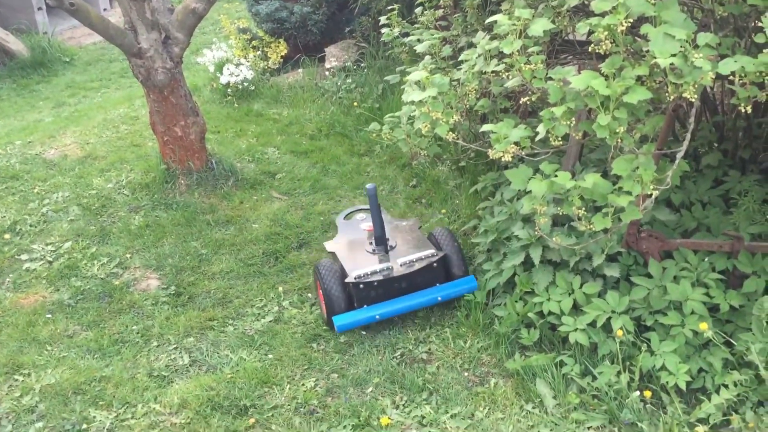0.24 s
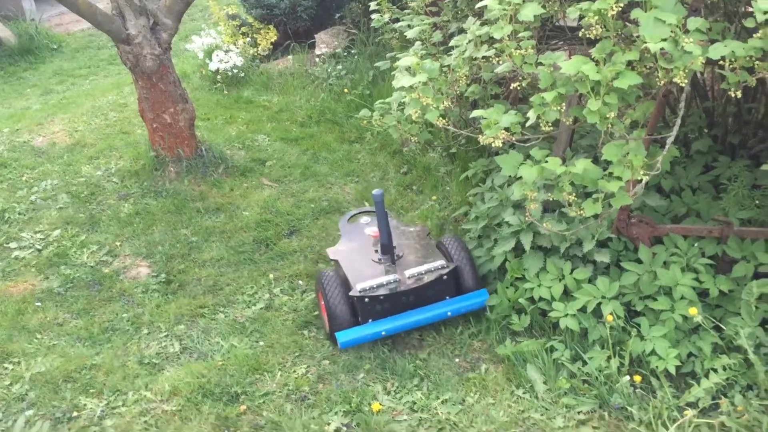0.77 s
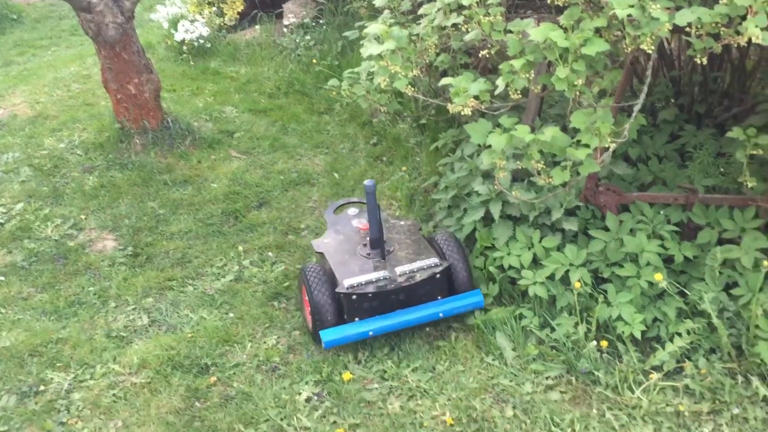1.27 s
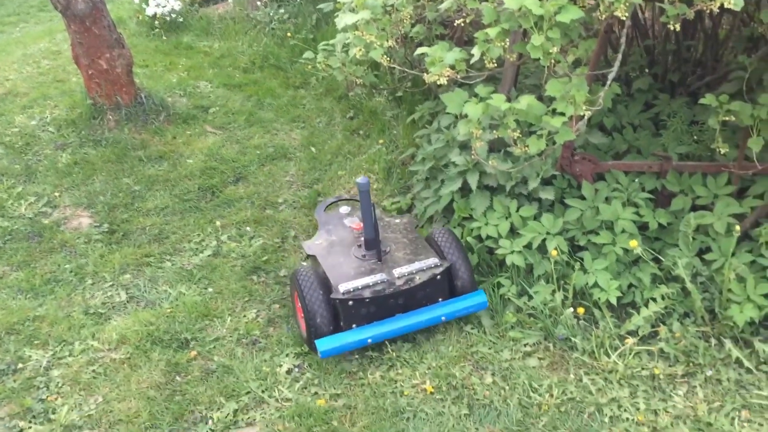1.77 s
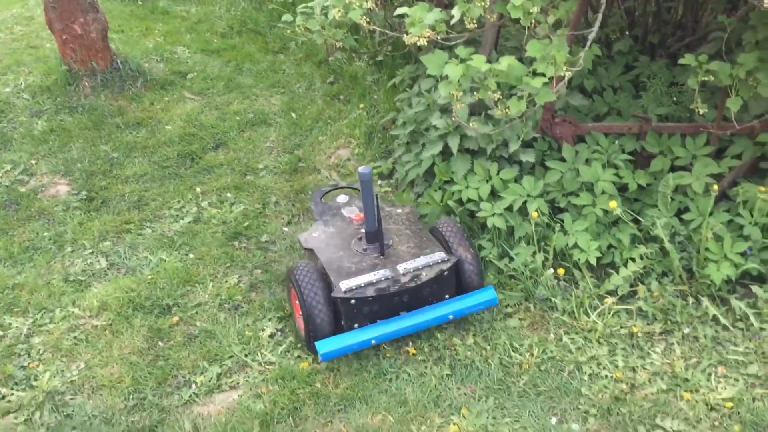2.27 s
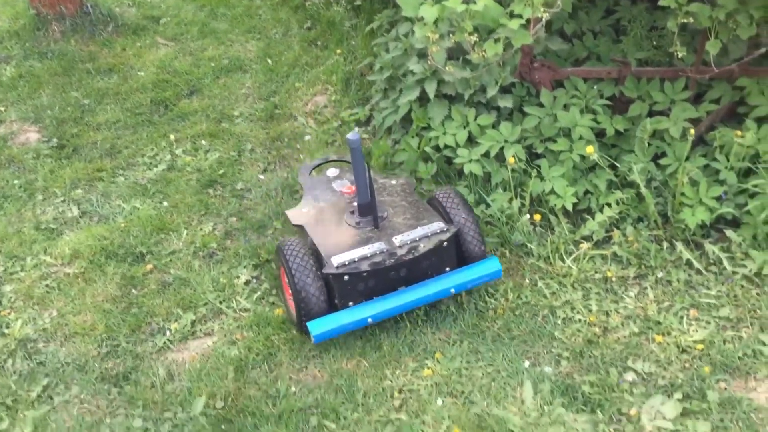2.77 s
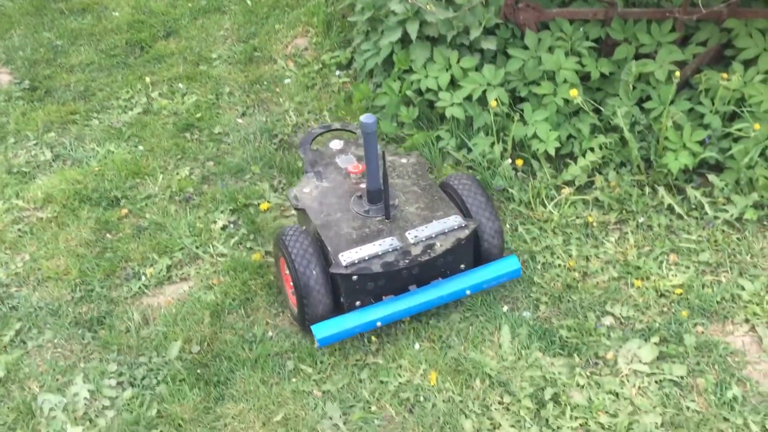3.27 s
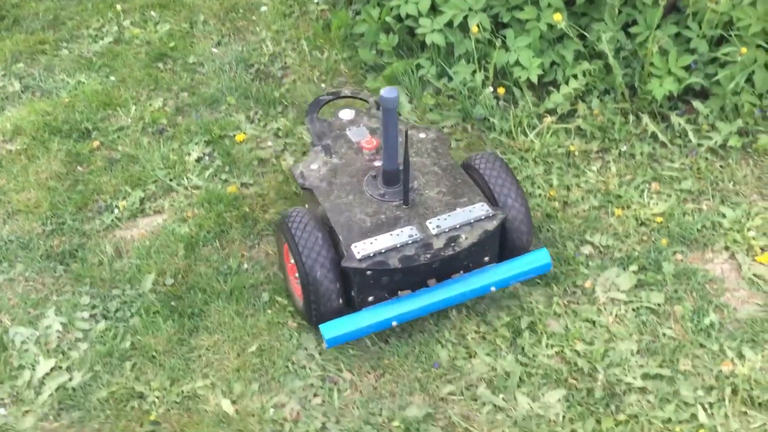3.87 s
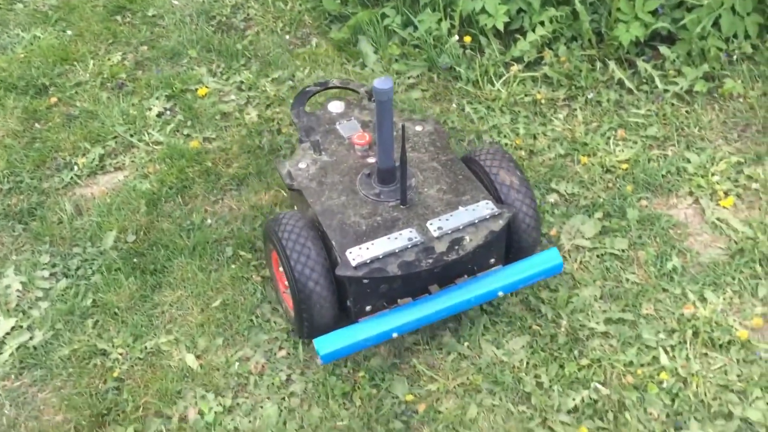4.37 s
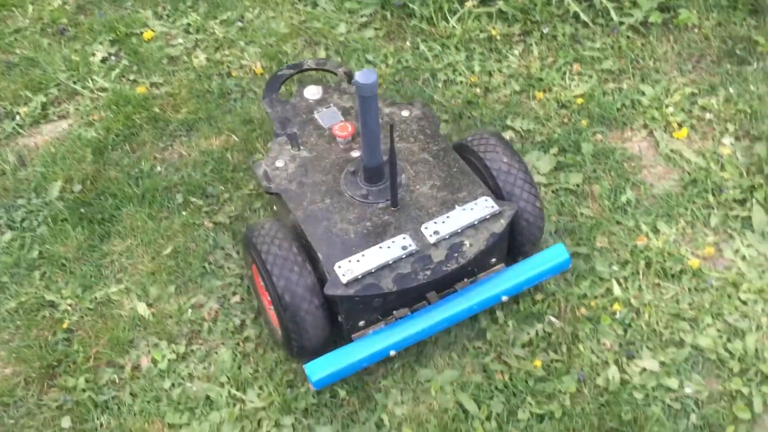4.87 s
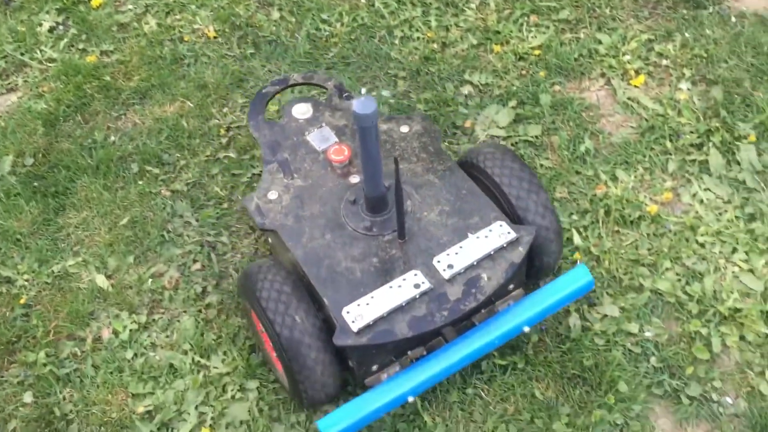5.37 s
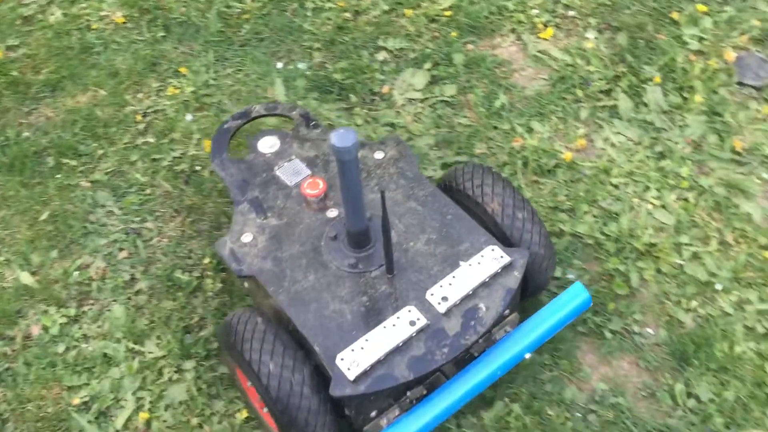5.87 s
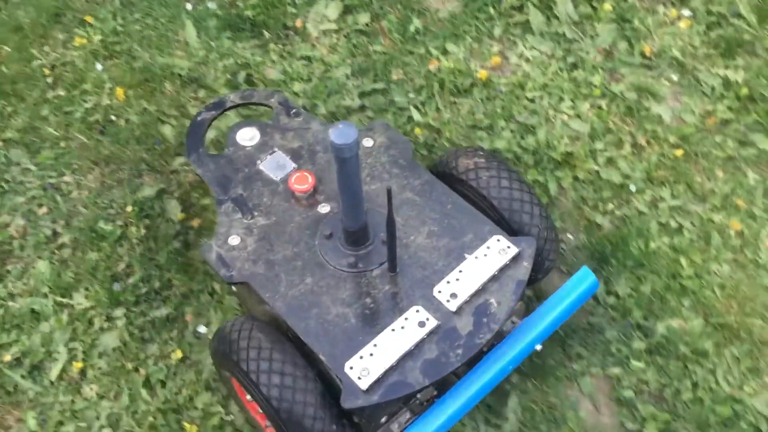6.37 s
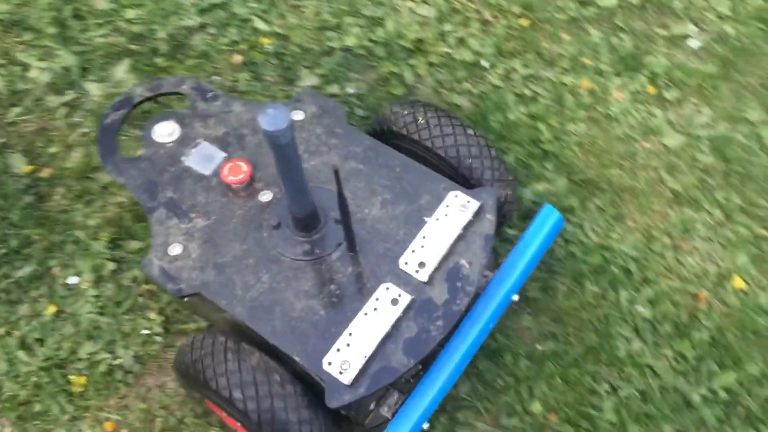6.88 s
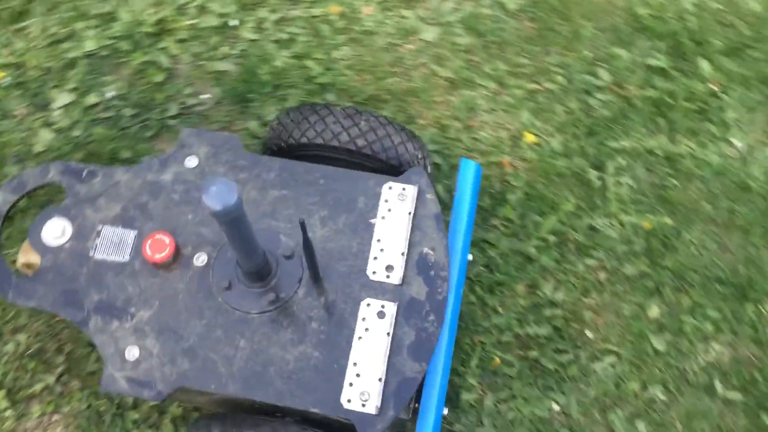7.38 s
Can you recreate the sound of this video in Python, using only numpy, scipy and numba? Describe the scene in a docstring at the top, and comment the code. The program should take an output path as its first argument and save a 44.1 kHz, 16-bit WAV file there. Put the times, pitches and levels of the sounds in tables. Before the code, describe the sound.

A small wheeled robot is already running on a lawn, about two metres away, and drives steadily nearer to roughly one metre by 6 seconds. Its gears make a nasal, wavering whine around 1.3 kilohertz, with rapid tooth rattle and raspy motor noise. Bumps make it surge and sag in pitch several times a second; brief coasts soften it. In the first second a second, lower gear tone joins briefly. From 1.7 seconds the whine grows stronger. Small clacks come near 2.8, 3.3 and 4 seconds, a sharper one at 6. Dull chassis knocks stand out at 3.3, 6.3 and, strongest, 6.9 seconds. Grass rustle swells around 1.6 and often after 5, with crisp snaps near 5.2, 6 and 6.9. A thin high whistle strengthens after 4.4, while low hum comes and goes. Soft outdoor rumble lies beneath; the drive continues to the end at 7.6 seconds.

```python
"""A small robot mower sings and rattles over a lawn towards the listener, ending about a metre away.
Its wheel gears make a wavering tone and rattling tooth hits, which surge as bumps load them.
Motors rasp and hum, their drivers whistle at a nearly fixed pitch, and the chassis knocks and drums.
Grass and leaves rustle, snap and crackle under the tyres, over a low outdoor rumble.
Tones are built from sine waves; rasps, rustles and rumble are filtered chance."""
import sys
import numpy as np
from scipy import signal
from scipy.fft import rfft, irfft
from scipy.io import wavfile
from scipy.ndimage import uniform_filter1d, map_coordinates
from numba import njit

SR = 44100
rng = np.random.default_rng(int(sys.argv[2]) if len(sys.argv) > 2 else 0)


def materialize(psi):
    """Save the field psi as 16-bit PCM at rate SR to the path in sys.argv[1].

    A 1-D psi becomes a single channel; in a 2-D psi each row is a channel.
    """
    bounded = np.clip(np.atleast_2d(psi).T, -1, 1)
    quanta = np.round(bounded * 32767).astype(np.int16)
    wavfile.write(sys.argv[1], SR, quanta)


N = 337083  # length of the scene in samples

TEETH = 20  # tooth meetings per turn of the motor shaft
LAWN_DB = -63.5  # base level of short grass at 1 m; rustle and crackle each add their own trim
# A wheel climbs a bump and its gears surge; the sag is the one midway, before inertia smooths it:
# (time [s], length [s], whine level [dB], rattle level [dB], sag of the tooth-mesh rate [Hz])
BUMP_CLIMBS = [(0.087, 0.077, -49.5, -55, 3.5), (0.211, 0.041, -53, -57, 80), (0.306, 0.052, -52, -61, 135),
               (0.406, 0.16, -49.5, -51.5, 98), (0.577, .11, -42, -50, 140), (0.739, 0.13, -52, -64, 61),
               (0.835, 0.095, -45, -56, 81), (1.021, 0.15, -48.5, -52, 67),
               (1.278, 0.049, -44.5, -58, 32.5), (1.379, 0.25, -50, -52.5, 32),
               (1.66, 0.13, -45.5, -56, 50), (1.77, 0.14, -36, -49, 110), (1.953, 0.14, -40, -50, 120.5),
               (2.238, 0.097, -41, -47.5, 92.5), (2.4, 0.125, -39.5, -53, 56),
               (2.527, 0.24, -42, -51.5, 79), (2.716, 0.22, -38, -49, 88), (2.947, 0.15, -40, -52.5, 52),
               (3.251, 0.14, -39, -48.5, 77), (3.425, 0.029, -36, -47, 80), (3.46, 0.047, -36, -46.5, 100),
               (3.633, 0.037, -38, -53, 59.5), (3.664, 0.041, -33.5, -44, 94),
               (3.717, 0.15, -41.5, -48, 113), (3.924, 0.026, -36, -44.5, 0),
               (4.016, 0.025, -37, -49, 60.5), (4.043, 0.07, -38, -44.5, 75),
               (4.181, 0.2, -40.5, -46.5, 57.5), (4.386, 0.15, -38.5, -42, 105.5),
               (4.544, 0.23, -42.5, -46.5, 42), (4.795, 0.15, -36.5, -44, 116.5),
               (5.019, .29, -44.5, -44.5, 62), (5.336, 0.22, -36.5, -48.5, 92),
               (5.608, 0.085, -37.5, -43.5, 74), (5.807, .22, -40, -49, 59),
               (6.017, 0.16, -39.5, -47.5, 111.5), (6.183, 0.22, -34, -46, 72.5),
               (6.462, .17, -38, -48.5, 64.5), (6.7, 0.21, -71, -71, 55.5),
               (6.964, 0.033, -31, -40.5, 69.5), (7.002, 0.063, -35, -43, 184.5),
               (7.102, 0.13, -55, -52, 60.5), (7.282, 0.056, -38, -47.5, 59),
               (7.371, 0.19, -45.5, -70, 41.5), (7.565, 0.092, -32.5, -45.5, 99)]
# The wheels roll off a bump and the gears run quietly:
# (time [s], length [s], drop of the grinding [dB])
QUIET_COASTS = [(0.02, 0.066, 2), (0.19, 0.03, 2.5), (.25, 0.075, 4.5), (1.19, 0.06, 2), (2.095, 0.057, 3),
                (2.185, 0.041, 4), (2.355, 0.047, 3.5), (3.115, 0.095, 5), (3.865, 0.05, 4.5),
                (3.96, 0.053, 3.5), (4.125, 0.032, 2), (5.72, 0.052, 3.5), (6.4, 0.075, 2.5)]


def undb(db):
    """Turn decibels into a plain factor."""
    return 10 ** (np.asarray(db) / 20)


def unit(x):
    """Scale to rms 1."""
    return x / np.sqrt(np.mean(x ** 2))


def curve(rows):
    """Join (time [s], value) rows by straight lines."""
    return np.interp(np.arange(N) / SR, *np.transpose(rows))


def walk(rate):
    """Smooth chance of rms 1, heading for a new value about 'rate' times a second."""
    step = int(SR / rate)
    held = np.repeat(rng.standard_normal(N // step + 1), step)
    smooth = uniform_filter1d(uniform_filter1d(held, step), step)
    return unit(smooth[:N])


def swells(rows):
    """Rise, hold and fall for each (time [s], length [s], height) row; the highest one counts."""
    attack_share, release_share = .28, .3  # of the length: broad bumps load the wheel more gently
    out = np.zeros(N)
    for s, length, height in rows:
        span = np.arange(max(int((s - length) * SR), 0), min(int((s + 2 * length) * SR), N))
        along = (span / SR - s) / length
        # half height is reached at the start and at the end
        shape = np.minimum(along / attack_share, (1 - along) / release_share) + .5
        out[span] = np.maximum(out[span], height * np.clip(shape, 0, 1))
    return out


def colour(x, points):
    """Filter with a (frequency [Hz], relative level [dB]) shape, using no future sound."""
    hz, db = np.transpose(points)
    size = 1024
    grid_db = np.interp(np.log(np.fft.rfftfreq(size, 1 / SR) + 1), np.log(hz), db)
    # fold the cepstrum so that the filter responds as early as it can
    cepstrum = irfft(np.log(undb(grid_db)))
    cepstrum[1:size // 2] *= 2
    cepstrum[size // 2 + 1:] = 0
    response = irfft(np.exp(rfft(cepstrum)))
    return signal.fftconvolve(x, response / np.linalg.norm(response))[:len(x)]


def resonate(x, hz, width):
    """One resonance, gain 1 at its centre."""
    return signal.lfilter(*signal.iirpeak(hz, hz / width, fs=SR), x)


def resonate_twice(x, hz, width):
    """The same resonance two times over, for steeper flanks."""
    return resonate(resonate(x, hz, width), hz, width)


@njit
def sweep(x, hz, width):
    """A moving resonance, gain 1 at its centre."""
    y, band, low = np.empty(len(x)), 0., 0.
    for i in range(len(x)):
        g, k = np.tan(np.pi * hz[i] / SR), width[i] / hz[i]
        v = (band + g * (x[i] - low)) / (1 + g * (g + k))
        band, low, y[i] = 2 * v - band, low + 2 * g * v, k * v
    return y


def shimmer(x, depth_db, width_hz, per_s):
    """Neighbouring bands swell and fade on their own, as different parts take turns; rms 1."""
    size = 512
    _, _, bands = signal.stft(x, nperseg=size)
    rows, frames = np.indices(bands.shape)
    places = [rows * SR / size / width_hz, frames * (size // 2) / SR * per_s]
    chance = map_coordinates(rng.standard_normal((256, 512)), places, order=3, mode="mirror")
    _, moving = signal.istft(bands * undb(depth_db * np.clip(chance, -2, 2)))
    return unit(moving[:N])


def add(out, s, sound):
    """Mix a sound in at time s."""
    i = max(int(s * SR), 0)
    out[i:i + len(sound)] += sound[:max(N - i, 0)]


def mesh_rate(wander=.006, deepen=.3, race_hz_per_db=10):
    """Teeth per second: the motor sags further along each climb and races on coasts, with inertia."""
    free_hz, inertia_s = 1368.6, .048  # rate without load; how slowly the motor follows the load
    t = np.arange(N) / SR
    sags = []
    for s, length, _, _, hz in BUMP_CLIMBS:
        deeper = 1 + deepen * np.clip((t - s) / length - .5, -.5, 1)
        sags.append(swells([(s, length, hz)]) * deeper)
    pull = race_hz_per_db * swells(QUIET_COASTS) - np.max(sags, axis=0)
    keep = np.exp(-1 / (inertia_s * SR))
    slowed = signal.lfilter([1 - keep], [1, -keep], pull)
    return (free_hz + slowed) * (1 + wander * walk(22))


def gear_load(grind, flutter_db=0.45, jitter_db=1.5, slack_db=3, wobble_db=1):
    """Strength of whine and rattle: low and fitful while teeth are slack, surging on each climb."""
    free_whine_db, free_rattle_db = -46.5, -49.5  # on level ground, at 1 m
    singing = swells([(s, length, undb(db)) for s, length, db, _, _ in BUMP_CLIMBS])
    shaking = swells([(s, length, undb(db)) for s, length, _, db, _ in BUMP_CLIMBS])
    fitful = unit(undb(slack_db * np.minimum(walk(120), 2)))
    idle_whine = undb(free_whine_db) * grind * fitful
    idle_rattle = undb(free_rattle_db + wobble_db * walk(13)) * grind
    force = np.hypot(singing, idle_whine) * undb(flutter_db * walk(45))
    shake = np.hypot(shaking, idle_rattle) * undb(jitter_db * walk(35))
    return force, shake


def whine(shaft, force, waver_db=2.5, stiffness=0.45, chatter_db=1.77):
    """The tooth-mesh tone, with wavering side lines from a slightly eccentric pinion in loose gears."""
    # lines of the whine, before their swing is limited:
    # (multiple of the motor shaft rate, relative level [dB])
    lines = [(10, -14), (17, -22.5), (19, -5.5), (20, 3), (21, -14), (30, -20.5)]
    slip = .1  # waver of every line's phase [rad]
    tone = 0
    for order, line_db in lines:
        side = round(order) != TEETH
        phase = 2 * np.pi * round(order) * shaft + slip * walk(130) + side * 1.4 * walk(12)
        level_db = line_db + side * waver_db * np.minimum(walk(21), 1)
        tone = tone + undb(level_db) * np.exp(1j * phase)
    # stiff teeth limit the swing, so part of the beat becomes vibrato
    limited = tone.real / (np.abs(tone) + 0.091) ** stiffness
    return unit(limited * undb(chatter_db * walk(220))) * force


def tooth_hits(shaft, scatter_db=2.5, lope=0.046):
    """Each tooth lands partly as it did a turn before, giving fine lines at multiples of shaft rate."""
    memory, jitter_s = .5, .00006
    at = np.flatnonzero(np.diff(np.floor(shaft * TEETH)))
    shift, landing, strength = rng.standard_normal((len(at), 3)).T
    fit = signal.lfilter([1], np.r_[1, np.zeros(TEETH - 1), -memory], landing)
    places = np.clip(at + (shift * jitter_s * SR).astype(int), 0, N - 1)
    hits = np.zeros(N)
    hits[places] = np.tanh(fit) * undb(scatter_db * np.clip(strength, -2, 2))
    return unit(hits * (1 + lope * np.sin(2 * np.pi * shaft)))


def rattle(shaft, force, shake, housing_db=3, click_follow=0.015, ring_follow=0.018):
    """Tooth hits ring the housing and click brightly; both lean slightly on quick changes of load."""
    # resonances of the gear housing: (frequency [Hz], basic width [Hz], relative level [dB])
    housing = [(584.7, 56, -1), (661.5, 67, 0.5), (725, 101, 0), (1026, 125, -9), (1140, 173, -5.5),
               (1314.5, 93, 2.5), (1727, 180, -11.5), (1886, 95, -4.5), (2140, 140, -13)]
    # level added to the housing's low resonances: (time [s], level [dB])
    low_ring = [(0, -3), (0.8, -7.5), (1.35, -13.5), (1.9, -2), (3.5, -2.5), (4.7, -3), (5.6, -1.5),
                (6.3, -2), (6.85, -1.5), (7.04, 2), (7.2, 2), (7.64, -0.5)]
    # tone colour of the clicks: (frequency [Hz], relative level [dB])
    click_colour = [(200, -22), (450, -18), (1550, 10.5), (2300, 8), (2750, 7.5), (3050, 7.5), (3300, 3),
                    (3850, 6), (4200, 0.5), (4550, 7.5), (4950, -15), (5250, -2.5), (6200, -3.5),
                    (7800, -19.5)]
    jump = force / uniform_filter1d(force, SR // 8)
    low_gain = undb(curve(low_ring))
    ring = 0
    for hz, width, db in housing:
        mode = undb(db) * resonate_twice(tooth_hits(shaft), hz, 1.28 * width)
        ring = ring + mode * (low_gain if hz < 850 else 1)
    ring = shimmer(ring, depth_db=2, width_hz=133.4, per_s=24)
    click = shimmer(colour(tooth_hits(shaft), click_colour), depth_db=3.5, width_hz=150, per_s=11)
    return (undb(housing_db) * ring * jump ** ring_follow + click * jump ** click_follow) * shake


def motors(shaft, grind, running_db=-44):
    """Brushes and bearings rasp on, pulsing twice a turn and easing when the wheels coast."""
    # tone colour of the rasp: (frequency [Hz], relative level [dB])
    running = [(120, -36.5), (230, -6.5), (320, -7), (450, -17.5), (650, -6), (860, -5), (1110, 1.5),
               (1500, -8.5), (1950, -6.5), (2600, -18.5), (3300, -7.5), (4550, -10), (4920, -8.5),
               (5350, -9.5), (7400, -26), (10000, -33)]
    pulse = 1 + 0.087 * np.sin(2 * np.pi * 2 * shaft)
    rasp = colour(rng.standard_normal(N) * pulse, running)
    return grind * undb(running_db) * shimmer(rasp, depth_db=5.0, width_hz=85, per_s=11)


def dull(x, depth=0.8, hz=3500, width_hz=3200):
    """Unloaded gears lose their bright edge while the wheels coast."""
    # depth: dB of dulling per dB of coasting
    return x + (undb(-depth * swells(QUIET_COASTS)) - 1) * resonate(x, hz, width_hz)


def hollow(x):
    """The gear noise changes with the angle: a hollow drifts and fills in, resonances come and go."""
    # the drifting hollow: (time [s], centre [Hz], width [Hz], depth [0-1])
    hollow_path = [(0, 2720, 800, 0.77), (1.3, 2770, 750, 0.8), (2.301, 2891, 750, 0.98),
                   (3.1, 2780, 690, 0.55), (3.8, 2800, 550, 0.33), (4.5, 2460, 454, 0.6),
                   (6, 2479, 451, 0.46), (7.64, 2513, 550.4, 0.59)]
    # resonances that stand out for a while; a negative boost has no effect:
    # (time [s], length [s], centre [Hz], width [Hz], boost [dB])
    facets = [(0, 6.4, 5860, 300, 3.5), (2.6, 0.25, 2596, 170, 10.5), (3.697, 0.94, 6113, 298, 2.5),
              (4.3, 1.3, 3746, 220.5, -2), (5.3, 2.31, 1978, 159.9, 5), (5.9, 1.87, 5350, 520, 5),
              (6.3, 1.33, 2954, 170, 3.5)]
    times, *columns = np.transpose(hollow_path)
    hz, width, depth = (curve(list(zip(times, column))) for column in columns)
    x = x - np.clip(depth, 0, 1) * sweep(x, hz, width)
    boosts = 0
    for s, length, centre, wide, db in facets:
        boosts = boosts + (undb(swells([(s, length, db)])) - 1) * resonate(x, centre, wide)
    return x + boosts


def drone(shaft, trim_db=-2, third_db=-9, waver_db=3.5):
    """Under even load the slower gear stage hums at half the mesh rate, with its third harmonic."""
    # when it drones, before the trim: (time [s], length [s], level [dB])
    drones = [(2.471, 0.17, -48.5), (4.175, 0.12, -43.5), (4.799, 0.12, -55), (5.006, 0.26, -49.5),
              (5.874, 0.23, -50), (6.721, 0.23, -48), (7.1, 0.49, -53)]
    phase = np.pi * TEETH * shaft
    base = np.sin(phase + 0.76 * walk(60))
    third = undb(third_db) * np.sin(3 * phase + .5 * walk(60))
    level = swells([(s, length, undb(db)) for s, length, db in drones])
    return np.sqrt(2) * (base + third) * level * undb(trim_db + waver_db * walk(30))


def other_wheel(slip=0.9, waver_db=2):
    """The other wheel labours: its gearbox drops out of step with the first and sings lower."""
    # when it labours: (time [s], length [s], level [dB], mesh rate [Hz])
    labours = [(0.428, 0.18, -48, 1192), (.6, 0.092, -45, 1140), (0.859, 0.21, -58, 1120)]
    t = np.arange(N) / SR
    tone = 0
    for s, length, db, hz in labours:
        sine = np.sin(2 * np.pi * hz * t + slip * walk(60.4))
        tone = tone + swells([(s, length, undb(db))]) * sine
    return np.sqrt(2) * tone * undb(waver_db * walk(49.3))


def clacks(ring_s=0.01, crack_s=0.002, crack_db=-2, crack_hz=1700, crack_width_hz=1800):
    """Slack teeth slam together with a short crack and ring the housing."""
    # slams of the teeth: (time [s], peak level [dB], ringing [Hz])
    slams = [(2.799, -35, 1300), (2.816, -38, 1283), (3.258, -35, 1343), (3.3, -38, 1308),
             (3.425, -38, 1326), (3.929, -40, 1361), (4.015, -37, 1350), (6.029, -27, 1894)]
    out, t = np.zeros(N), np.arange(SR // 12) / SR
    for s, peak_db, hz in slams:
        crack = unit(resonate(rng.standard_normal(len(t)), crack_hz, crack_width_hz)) * np.exp(-t / crack_s)
        clack = np.sin(2 * np.pi * hz * t) * np.exp(-t / ring_s) + undb(crack_db) * crack
        add(out, s, clack / np.abs(clack).max() * undb(peak_db))
    return out


def hum(trim_db=-1, hz=96, waver_db=2, blur_db=-5, blur_width_hz=45):
    """A low motor hum comes and goes, blurred by its own rumble."""
    # swells of the hum, before the trim: (time [s], length [s], level [dB])
    hums = [(1.847, 0.091, -63), (2.248, 0.39, -66), (3.418, 0.36, -62), (3.93, 0.51, -63),
            (4.746, 0.28, -64), (5.131, .18, -57.5), (5.847, 0.3, -57.5), (6.375, 0.2, -61),
            (6.661, 0.22, -57), (7.296, 0.31, -62)]
    tone = np.sqrt(2) * np.sin(2 * np.pi * hz * np.arange(N) / SR + 0.43 * walk(13))
    blur = unit(resonate_twice(rng.standard_normal(N), hz, blur_width_hz))
    level = swells([(s, length, undb(db)) for s, length, db in hums])
    return (tone + undb(blur_db) * blur) * level * undb(trim_db + waver_db * walk(15))


def drivers(trim_db=-2.5, fade_db=3.0, coast_lift=0.51):
    """The motor drivers whistle at a nearly fixed pitch, more strongly while the wheels coast."""
    # lines of the whistle: (frequency [Hz], relative level [dB])
    driver_lines = [(3922, 7.5), (7844, -18), (9329, -18)]
    # level of the whistle, before trim and coasting: (time [s], level [dB])
    whistle_level = [(0, -59), (0.3, -63.5), (0.6, -66), (0.95, -62), (1.8, -65.5), (2.3, -62), (2.8, -63),
                     (3.5, -70), (3.85, -62), (4.4, -56), (5.5, -53.5), (6.4, -54.5), (7.3, -50.5),
                     (7.64, -70)]
    t = np.arange(N) / SR
    whistle = 0
    for hz, db in driver_lines:
        phase = 2 * np.pi * hz * t + 0.23 * walk(7.6) + 0.29 * walk(90)
        whistle = whistle + undb(db + fade_db * walk(40)) * np.sin(phase)
    level_db = curve(whistle_level) + trim_db + coast_lift * swells(QUIET_COASTS)
    return undb(level_db) * unit(whistle)


def knocks(trim_db=-1, contact_s=0.0032, chatter_s=0.02, chatter_db=-5,
           clatter_hz=380, clatter_width_hz=520):
    """A bump gives the chassis a soft, quickly damped thud, and loose parts chatter against it."""
    # knocks, before the trim; each starts 3 ms earlier: (time [s], peak level [dB], pitch [Hz])
    bumps = [(0.152, -45, 320), (0.305, -42.5, 332), (0.852, -48, 332), (1.545, -42, 328),
             (1.694, -47, 355.6), (1.79, -42, 363), (2.088, -47.5, 332), (2.452, -38.5, 329),
             (3.182, -44, 337), (3.256, -35.5, 348), (3.277, -41, 324), (3.627, -42, 256.7),
             (4.135, -41.5, 324), (4.521, -38.5, 325.7), (5.188, -38.5, 372.7), (5.44, -37.5, 324),
             (5.768, -42, 336.2), (6.345, -33.5, 319.6), (6.944, -28.5, 318), (6.988, -41, 317),
             (7.222, -36, 342.3), (7.561, -40.5, 326.4)]
    # ringing modes: (multiple of the knock's pitch, time to fall 60 dB [s], relative level [dB])
    chassis = [(0.27, 0.19, -15), (0.76, 0.065, -18), (1, 0.086, 6), (1.17, 0.04, -15)]
    out, t = np.zeros(N), np.arange(SR // 5) / SR
    for s, peak_db, hz in bumps:
        ring = 0
        for ratio, t60, mode_db in chassis:
            sine = np.sin(2 * np.pi * (hz * ratio * t + rng.random()))
            ring = ring + undb(mode_db - 60 * t / t60) * sine
        thud = ring * (1 - np.exp(-t / contact_s)) ** 2  # soft contact, slow start
        chatter = rng.standard_normal(len(t)) * t * np.exp(-t / chatter_s * 2)
        chatter = resonate_twice(chatter, clatter_hz, clatter_width_hz)
        knock = unit(thud) + undb(chatter_db) * unit(chatter)
        add(out, s - .003, knock / np.abs(knock).max() * undb(peak_db + trim_db))
    return out


def rolling(trim_db=-1, hz=335, width_hz=130):
    """Bumpy ground keeps the chassis panels drumming."""
    # level of the drumming, before the trim: (time [s], level [dB])
    drumming = [(0, -60), (1.2, -89), (1.8, -67), (3.4, -71), (4.1, -61.5), (4.75, -66), (5.17, -53.5),
                (5.55, -65), (6.05, -52), (6.55, -59.5), (7.05, -52), (7.64, -55.5)]
    drum = resonate_twice(rng.standard_normal(N), hz, width_hz)
    return shimmer(drum, depth_db=5.5, width_hz=75.57, per_s=25) * undb(curve(drumming) + trim_db)


def stalk_snaps(snap_s=0.0013, tear_db=-18, tear_s=0.012, lead_s=0.0046):
    """Now and then a stalk snaps: a short crack, with fibres tearing before and after the break."""
    # snaps, before the blades' tone colour is put on: (time [s], peak level [dB])
    snap_times = [(1.6633, -35), (2.2652, -40), (2.5112, -36), (2.622, -39), (2.659, -36), (4.642, -29),
                  (5.0421, -30), (5.1534, -27.5), (5.1762, -40), (5.199, -27), (5.8016, -27), (5.8451, -48),
                  (5.972, -43), (6.0302, -26), (6.5842, -30), (6.6817, -38), (6.8899, -23), (7.6028, -30)]
    snaps, t = np.zeros(N), np.arange(-SR // 40, SR // 40) / SR
    for s, peak_db in snap_times:
        tearing = np.exp(-np.abs(t) / np.where(t < 0, lead_s, tear_s))
        fibres = undb(tear_db) * tearing * rng.exponential(size=len(t))
        snap = (t >= 0) * np.exp(-np.abs(t) / snap_s)
        crack = rng.standard_normal(len(t)) * (snap + fibres)
        add(snaps, s + t[0], crack / np.abs(crack).max() * undb(peak_db))
    return snaps


def grass(near, trim_db=5, per_s=3500, scatter_db=3.4, brighten=0.46):
    """Thousands of blades flick past the tyres, brighter when crushed harder; stalks snap and crackle."""
    # tyres push through tufts and leaves, before the trim: (time [s], length [s], level [dB])
    tuft_rows = [(0.387, 0.16, -68.5), (1.55, 0.18, -56.5), (1.727, 0.15, -62), (2.254, 0.34, -67.5),
                 (2.599, 0.0753, -61.5), (2.986, 0.081, -60.5), (3.202, 0.04, -64), (4.202, .12, -64),
                 (4.568, 0.18, -61), (5.018, 0.27, -58.5), (5.171, 0.052, -50), (5.424, 0.048, -58.5),
                 (5.479, 0.15, -62), (5.772, 0.13, -54.5), (5.889, 0.074, -58.5), (5.96, 0.079, -56),
                 (6.573, 0.13, -65), (6.832, 0.11, -55.5), (6.928, 0.2, -57.5)]
    # tone colour of blades and stalks: (frequency [Hz], relative level [dB])
    blade_colour = [(900, -33), (3000, -7), (6000, 17), (8000, 9), (9700, 11.5), (10500, 7), (11400, 13.5),
                    (13800, 7), (14700, 4), (15600, 15)]
    tufts = swells([(s, length, undb(db)) for s, length, db in tuft_rows])
    lawn = undb(LAWN_DB) * near ** 1.65
    crush_db = 20 * np.log10(np.maximum(tufts, lawn)) + 1.45 * walk(130)
    rustle = 0
    edges_hz = [800, 6000, 8500, 11000, 13500, 16000]
    heights = np.linspace(-1, 1, len(edges_hz) - 1)  # from the lowest band to the highest
    for low_hz, high_hz, height in zip(edges_hz, edges_hz[1:], heights):
        present = rng.random(N) < per_s / SR
        strength = undb(scatter_db * np.minimum(rng.exponential(size=N), 5))
        flicks = unit(present * rng.choice([-1, 1], N) * strength)
        band_filter = signal.butter(3, (low_hz, high_hz), "band", fs=SR, output="sos")
        flicks = signal.sosfilt(band_filter, flicks)
        rustle = rustle + flicks * undb(brighten * height * np.clip(crush_db + 60.0, -10, 4))
    rustle = shimmer(rustle, depth_db=4.5, width_hz=300, per_s=60)
    blades = colour(rustle * undb(crush_db + trim_db) + stalk_snaps(), blade_colour)
    return blades + crackle(undb(crush_db))


def crackle(crush, trim_db=4, per_s=55, busier=1.2, scatter_db=4.5, cycles=9,
            low_hz=7000, high_hz=15500):
    """Single stiff blades and dry bits tick at their own pitch, more often where more is crushed."""
    tries = 12000  # possible ticks; luck decides which ones sound
    t = np.arange(SR // 100) / SR
    out = np.zeros(N)
    for when, luck, pitch, size, damping in rng.random((tries, 5)):
        amount = crush[int(when * N)] / undb(LAWN_DB)
        if luck < per_s * N / SR / tries * amount ** busier:
            hz = low_hz + pitch * (high_hz - low_hz)
            tick = np.sin(2 * np.pi * hz * t) * np.exp(-t * hz / (cycles * (.2 + damping)))
            strength = undb(scatter_db * min(-np.log(1 - size), 3)) * np.sqrt(amount)
            add(out, when * N / SR, tick * strength)
    return out * undb(LAWN_DB + trim_db)


def garden(swell_db=2.0):
    """Low, uneven outdoor rumble: coloured noise with a wandering level."""
    # tone colour of the rumble: (frequency [Hz], relative level [dB])
    garden_colour = [(20, -24), (35, -15.5), (55, 0), (78, 0.5), (125, -5.5), (190, -9), (450, -31.5),
                     (2000, -17), (15000, -66)]
    # level of the rumble, before it wanders: (time [s], level [dB])
    rumble_level = [(0, -59), (0.7, -62), (1.2, -63), (1.9, -62), (2.8, -62), (3.8, -58), (4.4, -62.5),
                    (5.3, -62.5), (5.75, -59), (6.3, -62.5), (6.8, -60), (7.64, -62.5)]
    rumble = colour(rng.standard_normal(N), garden_colour)
    return rumble * undb(curve(rumble_level) + swell_db * walk(7))


def scene():
    """Gears, motors, chassis and grass over a quiet garden."""
    # the robot comes closer: (time [s], distance [m])
    distance = [(0, 2.28), (2.5, 1.74), (4, 1.516), (5, 1.316), (6, 1.04), (7.64, 1.12)]
    near = 1 / curve(distance)
    grind = near * undb(-swells(QUIET_COASTS))
    shaft = np.cumsum(mesh_rate() / TEETH) / SR  # turns of the motor shaft
    force, shake = gear_load(grind)
    gear_noise = hollow(dull(rattle(shaft, force, shake) + motors(shaft, grind)))
    gear_tones = whine(shaft, force) + drone(shaft) + other_wheel()
    drive = gear_tones + gear_noise + clacks() + hum() + drivers()
    chassis_sound = knocks() + rolling()
    return (drive + chassis_sound + grass(near) + garden())[None]


def record(dry, low_cut_hz=38, top_hz=15750):
    """The recorder cuts the deepest bass and the top."""
    dry = signal.sosfilt(signal.butter(4, low_cut_hz, "high", fs=SR, output="sos"), dry)
    return signal.sosfilt(signal.ellip(12, .2, 70, top_hz, fs=SR, output="sos"), dry)


dry = scene()
out = record(dry)
materialize(out)
```